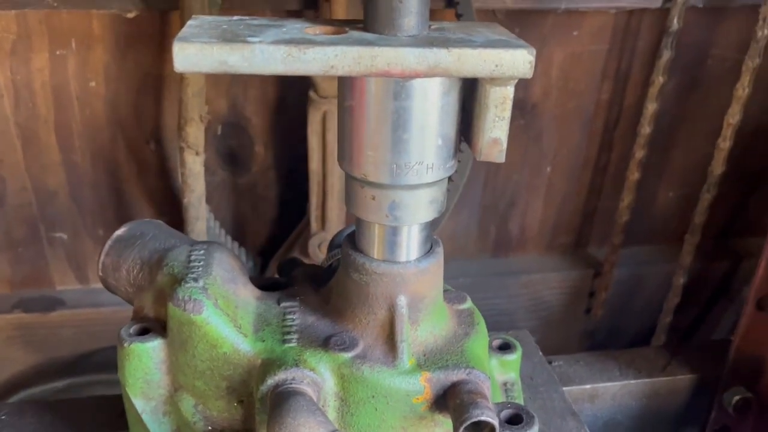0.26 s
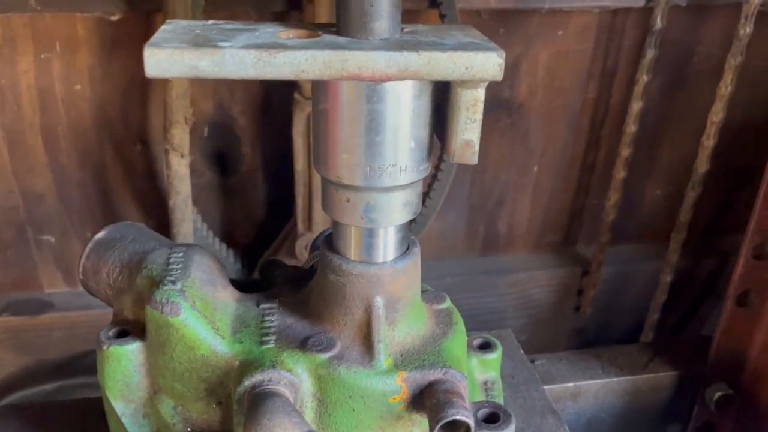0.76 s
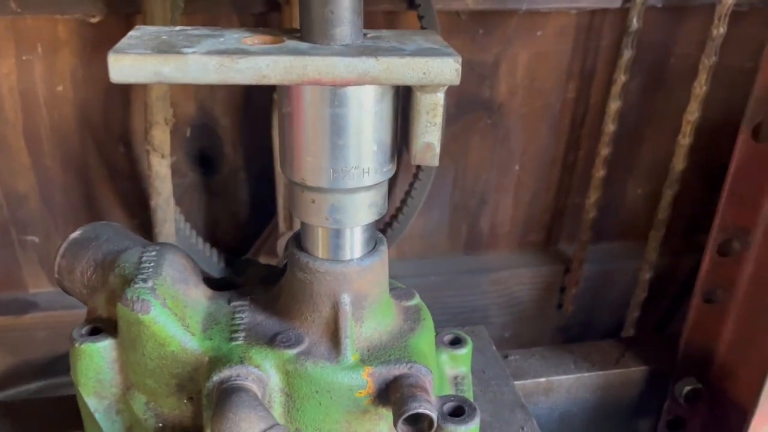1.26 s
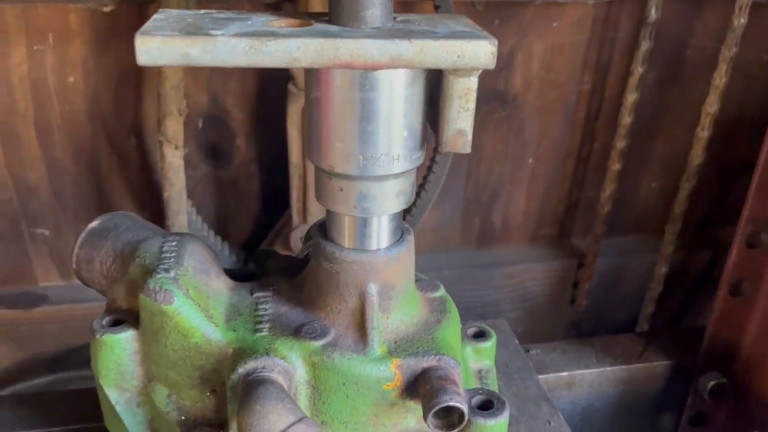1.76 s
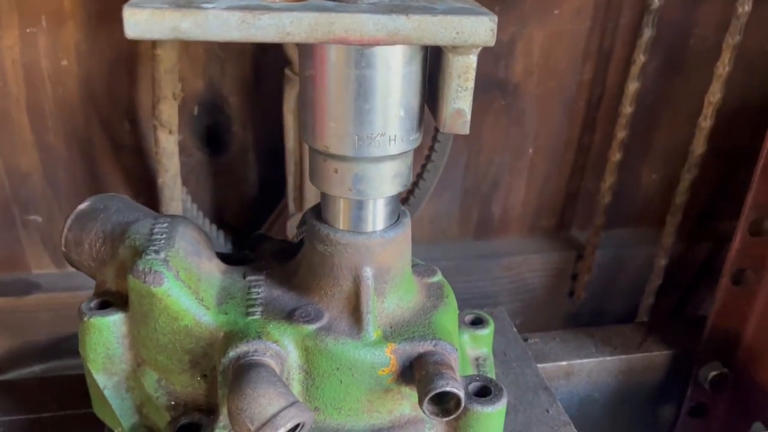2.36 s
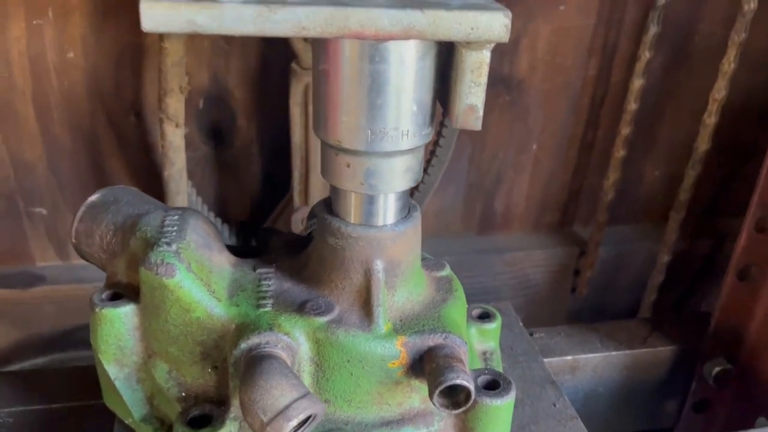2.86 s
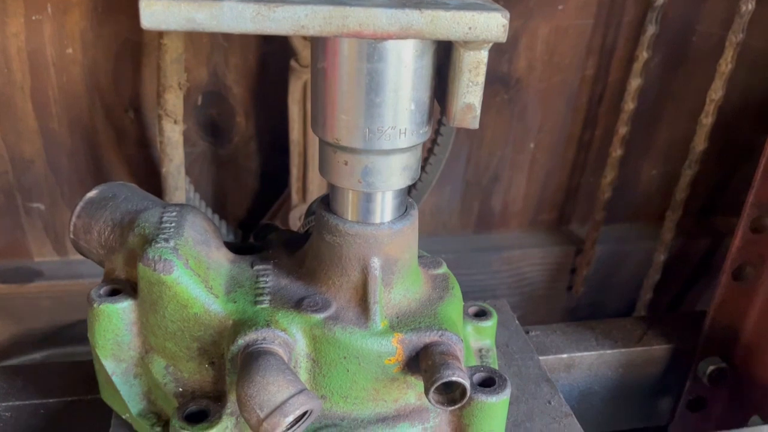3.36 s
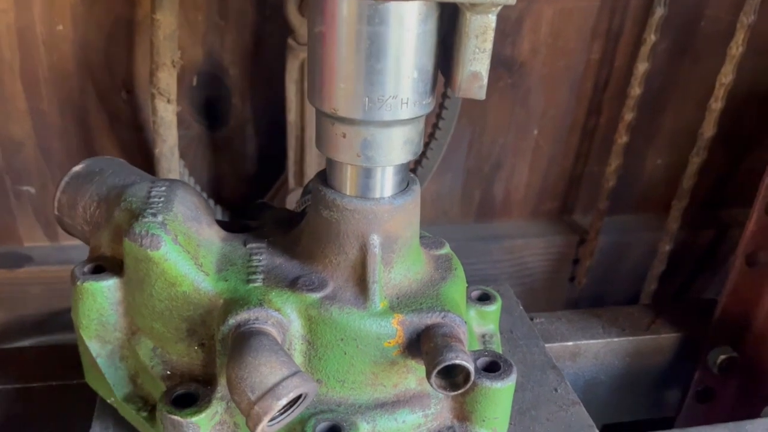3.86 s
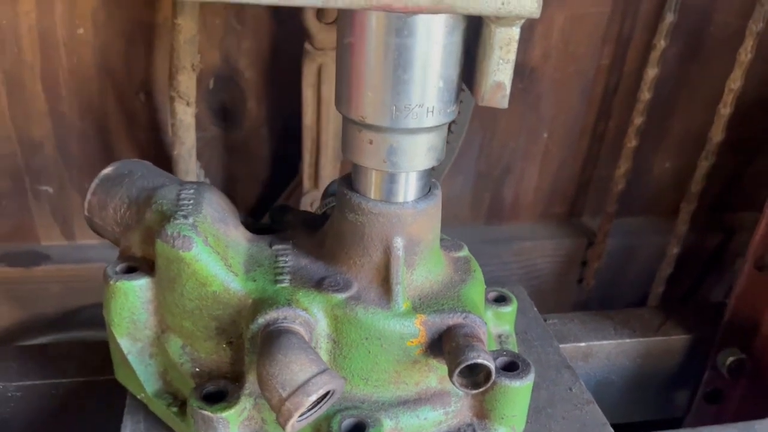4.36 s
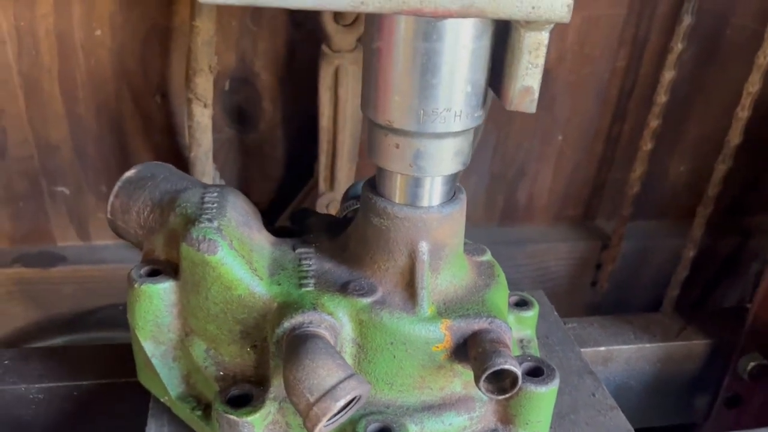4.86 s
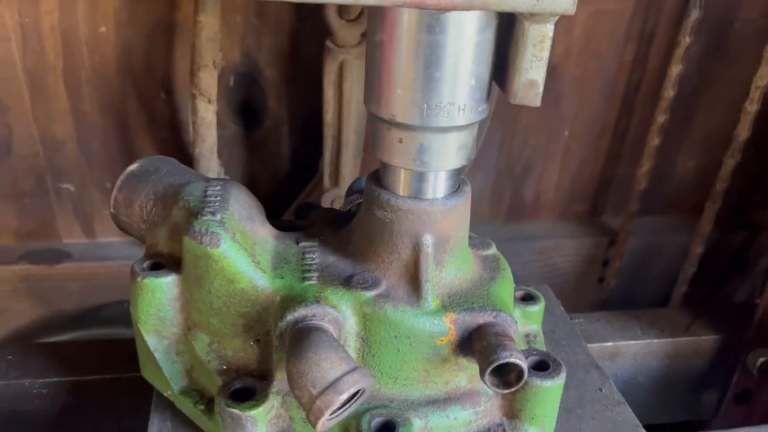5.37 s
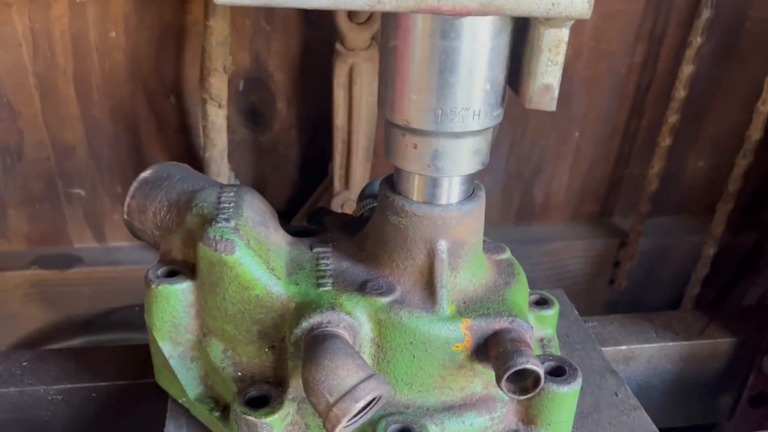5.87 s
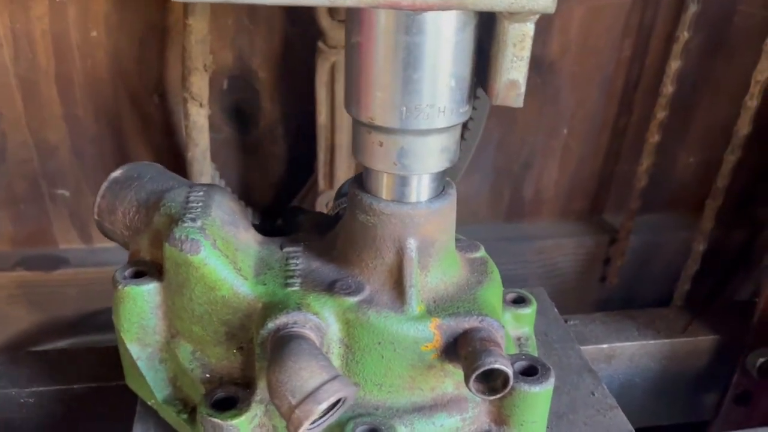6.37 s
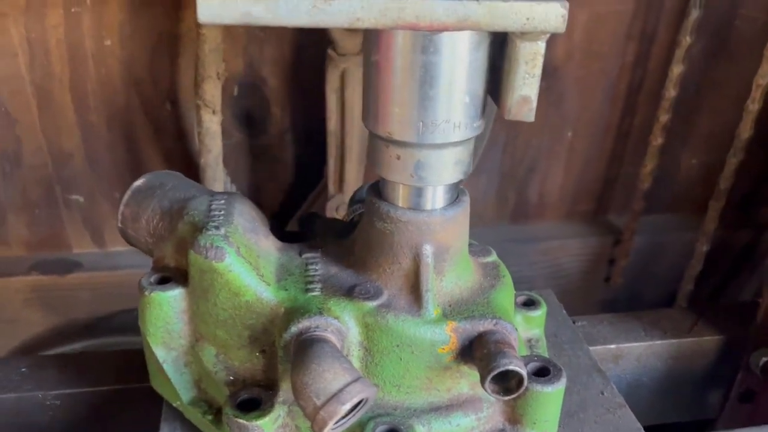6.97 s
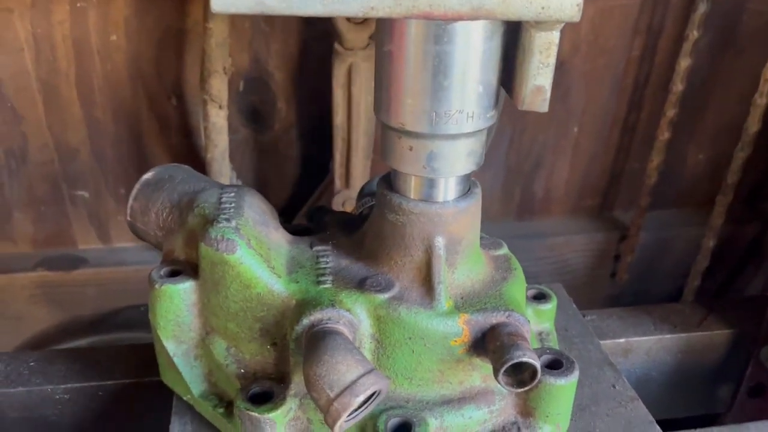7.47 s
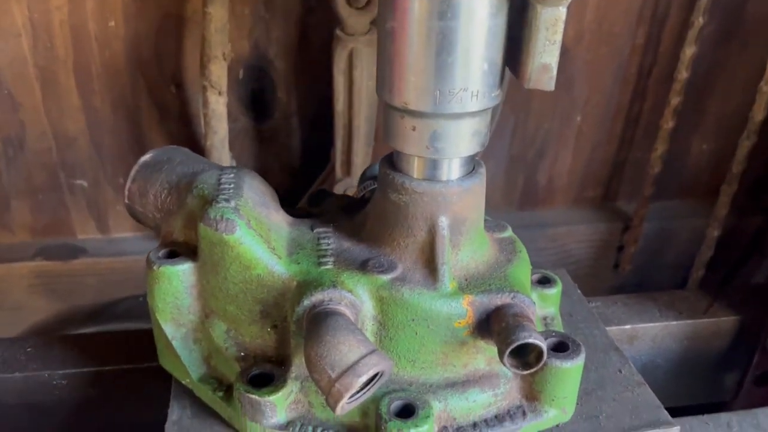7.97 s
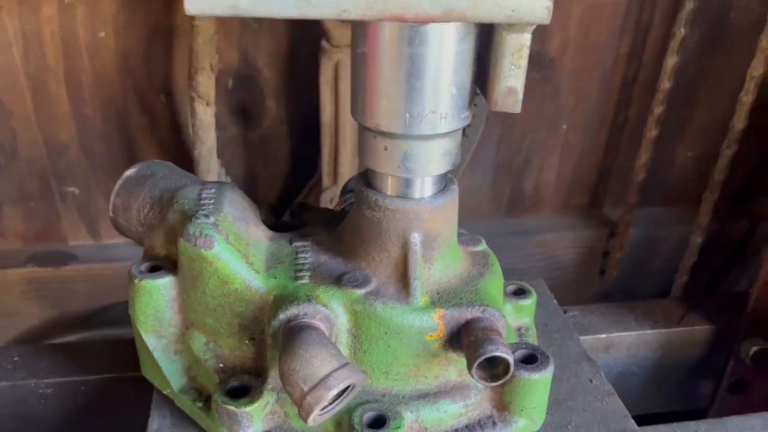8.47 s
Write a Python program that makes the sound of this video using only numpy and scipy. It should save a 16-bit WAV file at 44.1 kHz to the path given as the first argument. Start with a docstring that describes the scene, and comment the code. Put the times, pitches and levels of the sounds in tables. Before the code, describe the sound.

Close stereo phone pickup in a small wooden shed: a hydraulic press is pumped by hand. Its loose handle scrapes and clinks at each turn of the stroke, and roughly every one and a third seconds the bearing slips with a hard crack that rings frame and housing and thumps the boards. One brighter clank rings near the middle. The echo is short; faint rumble, hiss and high crickets lie underneath.

```python
"""A hand-pumped hydraulic press in a wooden shed, heard by a phone held close.
Its loose handle scrapes and clinks at each turn of the stroke; its bearing slips down with a crack that
rings frame and housing and shakes the boards. Steel parts are sets of fading tones (modes) set off by
short pushes; scrapes, cracks and the shed's echo are shaped noise. Crickets, a gliding tone in pulses,
trill outside over faint rumble and hiss made of filtered noise."""
import sys
import numpy as np
from scipy import signal
from scipy.fft import rfft, irfft
from scipy.io import wavfile
from scipy.ndimage import uniform_filter1d

SR = 44100
rng = np.random.default_rng(int(sys.argv[2]) if len(sys.argv) > 2 else 0)


def master_out(mix):
    """Clip the mix to full scale and print it as 16-bit PCM to the path in sys.argv[1]."""
    frames = np.transpose(np.atleast_2d(mix))
    ceiling = np.clip(frames, -1, 1)
    pcm = np.round(ceiling * 32767).astype(np.int16)
    wavfile.write(sys.argv[1], SR, pcm)


N = 384993
HZ = np.fft.rfftfreq(N, 1 / SR) + 1e-3  # spectrum lines, kept just above zero
FREE_MS = 13.5  # a struck part touches again this long after the blow


def undb(db):
    """Turn decibels into a plain factor."""
    return 10 ** (np.asarray(db) / 20)


def along(table):
    """Read a (frequency [Hz], value) table at every spectrum line."""
    hz, value = np.transpose(table)
    return np.interp(np.log(HZ), np.log(hz + 1), value)


def unit(x):
    """Scale a sound to an average (RMS) strength of 1."""
    return x / np.sqrt(np.mean(x ** 2))


def walk(rate):
    """Random values 1 / rate seconds apart, joined by straight slides."""
    spacing = int(SR / rate)
    steps = np.repeat(rng.standard_normal(N // spacing + 1), spacing)
    return uniform_filter1d(steps, spacing)[:N]


def coloured(table):
    """Steady noise whose spectrum follows a table."""
    spectrum = rfft(rng.standard_normal(N)) * undb(along(table))
    return unit(irfft(spectrum, N))


def place(at, size):
    """Put pushes of the given sizes on a silent track."""
    track = np.zeros(N, size.dtype)
    np.add.at(track, np.minimum(at, N - 1).ravel(), size.ravel())
    return track


def pole(hz, t60):
    """One sample's turn and fade of a mode that drops 60 dB in t60 seconds."""
    return np.exp((2j * np.pi * hz - np.log(1000) / t60) / SR)


def ring(push, hz, t60):
    """One fading mode driven by a force."""
    return signal.lfilter([1], [1, -pole(hz, t60)], push).imag


def contacts(blows, count, spread):
    """A light first touch, the main contact just after, then a rattle over a share of the free time."""
    time_s = np.array(blows)[:, 0]
    start = time_s[:, None] * SR
    free = FREE_MS * SR / 1000
    order = np.arange(count)
    rattle = rng.random((len(time_s), count)) * spread * free
    later = np.where(order > 1, rattle, order * 0.001206 * SR)
    size = undb(np.select([order == 0, order == 1], [-8.0, 0], -6.5))
    size = size * rng.choice([-1, 1], later.shape)
    # the contacts of one blow share its energy
    size = size / np.sqrt(np.sum(size ** 2, axis=1, keepdims=True))
    return (start + later).astype(int), size, (start + free).astype(int)


def body(modes, blows, blow_db, scatter_db, spread, choke, push_ms, count):
    """Every blow shares out differently over the modes; touching again chokes part of the ring."""
    at, size, touch = contacts(blows, count, spread)
    out = 0
    for hz, db, t60 in modes:
        chance = rng.standard_normal((len(blow_db), 2))
        strength = np.sign(chance[:, 0]) * undb(blow_db + db + scatter_db * chance[:, 1])
        share = size * strength[:, None]
        # what still rings at the new touch is partly taken away
        left_over = np.sum(share * pole(hz, t60) ** (touch - at), axis=1, keepdims=True)
        push = place(at, share + 0j) - choke * place(touch, left_over)
        out = out + ring(push, hz, t60)
    # a softer contact pushes longer and leaves the treble out
    shape = np.hanning(int(push_ms * SR / 1000) + 3)
    return np.convolve(out, shape / shape.sum())[:N]


def burst(colour, blow_db, tail_s):
    """Modes too dense to tell apart merge into a short burst of noise."""
    at, size, _ = contacts(BLOWS, count=5, spread=0.97)
    pushes = place(at, np.abs(size) * undb(blow_db)[:, None])
    fade = signal.lfilter([1], [1, -np.exp(-1 / (tail_s * SR))], pushes)
    return uniform_filter1d(fade, size=45, origin=22) * coloured(colour)


# colour of the outside air: (frequency [Hz], relative level [dB per Hz])
AIR_COLOUR = [(18, -39.5), (30, -10), (64, -8.5), (161, -18.5), (259, -21.5), (461, -25.5), (510, -19),
              (1050, -31.5), (1540, -21.5), (2130, -30.5), (2350, -27.5), (2950, -31), (6410, -38),
              (7640, -20.5), (12000, -47), (15600, -79.5), (22000, -120)]
# how alike left and right are: (frequency [Hz], likeness [0-1])
AIR_LIKENESS = [(60, .95), (300, 1), (1400, 0.6), (3000, 0.7), (7000, 0), (15000, 0.16)]


def air():
    """Rumble and hiss from outside; the bass is nearly the same at both ports and wanders in level."""
    mid, side = (rfft(rng.standard_normal(N)) * undb(along(AIR_COLOUR)) for _ in range(2))
    alike = along(AIR_LIKENESS)
    both = mid * np.sqrt(1 + alike) + side * np.sqrt(1 - alike) * np.array([[1], [-1]])
    bass = 1 / (1 + (HZ / 250) ** 2)
    rumble = irfft(both * bass, N) * undb(3.4 * walk(0.55))
    hiss = irfft(both * (1 - bass), N) * undb(0.5 * walk(3.1))
    return undb(-65) * unit(rumble + hiss)


def crickets(hz, rate, db):
    """A steady trill: each wing stroke rises to one pitch and falls again, swelling and fading over seconds."""
    turn = np.cumsum(rate * (1 + 0.035 * walk(4.5))) / SR % 1 - .5  # place within a stroke
    pulse = np.exp(-(turn / 0.12) ** 2)
    tone = np.sin(2 * np.pi * np.cumsum(hz * (1 - 2.4 * turn ** 2)) / SR)
    return undb(db + 1.8 * walk(1.0) + 2.5 * walk(90)) * unit(pulse * tone)


# the handle scrapes in its socket:
# (time [s], length [s], level at the start [dB], centre of the hiss [Hz])
SCRAPE_TIMES = [(0.007, 0.18, -68.5, 2210), (0.241, 0.058, -63.5, 2300), (.57, 0.078, -77.5, 3340),
                (1.738, 0.079, -60.5, 2300), (2.348, 0.043, -70, 2600), (3.012, 0.1, -68, 1940),
                (3.221, 0.075, -63, 2200), (3.95, 0.14, -71.5, 5400), (4.238, 0.046, -70, 2500),
                (4.328, 0.048, -65, 2496), (5.953, 0.17, -62.5, 2385), (6.413, 0.1, -64, 3030),
                (7.267, 0.14, -57.5, 2543), (7.4, 0.1, -67.5, 2100), (8.615, .065, -61, 2500)]
# colour of the scraping: (frequency [Hz], relative level [dB per Hz])
SCRAPE_COLOUR = [(900, 3.5), (1900, -11), (2600, -11), (3300, -15.5), (4200, -13), (6000, -5.5),
                 (10000, 2.5)]
# handle modes: (frequency [Hz], relative level [dB], time to fade by 60 dB [s])
HANDLE_MODES = [(795, -11, .08), (2159, -3, .06), (2290, -12, .05), (4102, 0, .09), (4092, -21, .3),
                (4112, -19, .28), (4215, -9, .06), (6545, -8, .08), (6580, -24, .35), (7410, -14, .06),
                (9490, -11, .07), (11760, -26, .04)]


def scrapes():
    """Dry steel sliding on steel: a gritty hiss that catches, lets go and keeps the handle singing."""
    swell_db, release_s = 8, 0.013  # it grows as the handle nears its stop
    half_width_octaves = .42
    t = np.arange(N) / SR
    grit = np.zeros(N)
    hiss = undb(5.0 * walk(220)) * coloured(SCRAPE_COLOUR)
    for start_s, length_s, db, hz in SCRAPE_TIMES:
        swell = undb(db + swell_db * np.clip((t - start_s) / length_s, 0, 1))
        release = np.exp(-np.maximum(t - start_s - length_s, 0) / release_s)
        level = (t > start_s) * swell * release
        edges = hz * 2. ** np.array([-half_width_octaves, half_width_octaves])
        sos = signal.butter(2, edges, "band", fs=SR, output="sos")
        grit += uniform_filter1d(level, size=400) * unit(signal.sosfilt(sos, hiss))
    singing = sum(undb(db) * ring(grit, hz, t60) for hz, db, t60 in HANDLE_MODES)
    return grit + undb(-35.5) * singing


# boards shaken: (time [s], low mode level [dB], high mode level [dB], high mode frequency [Hz],
# time to fade by 60 dB [s])
BOARD_THUDS = [(0.163, -50.5, -48.5, 68.3, 0.76), (0.509, -55, -63, 68, 0.4),
               (0.976, -38.5, -33, 69.9, 0.84), (1.269, -65, -47.5, 70.7, 0.57),
               (1.987, -46, -50, 67.2, 0.52), (2.514, -52, -40.5, 66.7, 0.44),
               (2.809, -61, -54, 65.3, 0.57), (3.444, -40, -45.5, 70.6, 0.37),
               (3.839, -30.5, -36.5, 74.7, 0.68), (4.119, -62, -50.5, 75.5, 0.57),
               (4.388, -44.5, -43, 69.6, 0.58), (4.732, -51, -48, 83.6, 0.71),
               (4.827, -47.5, -39, 76.2, 0.89), (5.178, -33, -27.5, 76.9, 0.5),
               (5.457, -74, -47, 83.3, 0.27), (5.955, -58.5, -55.5, 69, 0.35),
               (6.187, -43.5, -40.5, 70.4, 0.49), (6.542, -45, -34, 77.3, 1.3),
               (7.212, -64.5, -53, 66.4, 1.8), (7.53, -38.5, -59, 67.3, 0.38),
               (7.891, -35.5, -37.5, 72.5, 0.69), (8.189, -53, -76, 68.3, 0.33),
               (8.454, -79, -60.5, 76.8, 0.26)]


def boards():
    """Two low modes of the shed swell for a moment after a push, then die away; the load shifts the higher one."""
    low_hz, rise_ms = 58.13, 4.1
    out = np.zeros(N)
    for time_s, low_db, high_db, high_hz, t60 in BOARD_THUDS:
        start = int(time_s * SR)
        t = np.arange(N - start)[:SR] / SR
        swell = (1 - np.exp(-t * 1000 / rise_ms)) ** 2 * undb(0.5 - 60 * t / t60)
        low = undb(low_db) * np.sin(2 * np.pi * low_hz * t)
        high = undb(high_db) * np.sin(2 * np.pi * high_hz * t)
        out[start:][:SR] += swell * (low + high)
    return out * undb(1.5 * walk(25))


# every blow: (time [s], force on the frame [dB], ring of the handle [dB], knock into the table [dB],
# crack [dB])
BLOWS = [(0.3112, -35.5, -32, -49, -46), (0.3774, -55, -66, -50, -60), (0.405, -35, -71, -42, -46.5),
         (0.4482, -58, -76, -39, -57), (0.9647, -21, -68, -20.5, -38), (1.103, -53, -74.5, -28, -81),
         (1.2529, -31.5, -30, -54, -31.5), (1.2699, -32.5, -39, -36, -70), (1.3101, -22, -26.5, -61, -23),
         (1.3224, -26, -23.5, -35, -32.5), (1.8057, -29, -26.5, -51, -32.5), (1.824, -45.5, -35, -49, -40),
         (1.8794, -67, -69.5, -45, -62), (1.9006, -37.5, -67, -53.5, -58), (1.946, -44, -58, -32, -52.5),
         (2.0794, -82, -89.5, -48, -83), (2.1864, -79, -76, -89, -69), (2.473, -78, -91, -41.5, -83.5),
         (2.5139, -61, -88, -33, -82), (2.6717, -42.5, -55.5, -53, -60), (2.7289, -28, -25, -46, -30),
         (2.7818, -21.5, -24, -46, -25), (2.7954, -33.5, -29.5, -37.5, -33),
         (2.8108, -50, -66, -25.5, -56.5), (3.2788, -34.5, -32.5, -62, -41), (3.3047, -41, -37, -58, -37.5),
         (3.3886, -31.5, -38, -55, -24.5), (3.407, -22.5, -38.5, -25, -26), (3.5634, -75, -83, -49, -79),
         (3.7339, -54, -64, -80, -52), (3.8357, -15.5, -42, -18, -31), (3.9204, -51, -77, -39, -78),
         (4.067, -60, -75, -47, -66), (4.1111, -23.5, -38.5, -34, -29.5), (4.1345, -30, -34, -43.5, -35),
         (4.1707, -25, -30.5, -36, -30.5), (4.189, -42.5, -42.5, -50.5, -39),
         (4.3745, -14, -27, -17.5, -25.5), (4.619, -47, -72, -38.5, -57), (4.64, -40, -50, -21.5, -49),
         (4.6554, -28.5, -28.5, -25, -41), (4.749, -32.5, -32, -31, -23), (4.7569, -27, -44, -21.5, -40),
         (4.8968, -66.5, -81, -45.5, -78), (4.9556, -58.5, -73, -57.5, -55),
         (4.991, -53, -86.5, -62.5, -48), (5.1644, -20.5, -58, -18, -40.5),
         (5.3973, -39, -42.5, -57.5, -66), (5.4561, -26, -37, -44.5, -29), (5.4744, -41.5, -31, -40, -28.5),
         (5.5248, -21.5, -29.5, -35, -27), (5.8331, -51, -84, -55.5, -56.5),
         (5.971, -53, -76.5, -51, -55.5), (6.0034, -39.5, -65.5, -73, -53),
         (6.0224, -50, -63.5, -60.5, -58), (6.0934, -41, -34.5, -65, -36.5),
         (6.1508, -24, -37, -25.5, -20.5), (6.2503, -52.5, -72, -41, -61),
         (6.4348, -63.5, -61, -62.5, -55.5), (6.4782, -63, -68, -55.5, -46.5),
         (6.5356, -27.5, -59.5, -21.5, -67.5), (6.8209, -28.5, -27.5, -47.5, -24),
         (6.8351, -28, -32, -55, -25.5), (6.8702, -21.5, -32.5, -34.5, -25),
         (6.8844, -27, -22.5, -44, -33.5), (7.1752, -40.5, -54, -46.5, -63), (7.3014, -49, -75, -49, -75),
         (7.3497, -32.5, -30.5, -50, -40.5), (7.3806, -37.5, -33, -65.5, -41),
         (7.451, -48.5, -60, -55, -58), (7.4764, -35.5, -54, -30.5, -43), (7.4864, -54, -67.5, -26, -61.5),
         (7.5894, -65.5, -95.5, -39.5, -76), (7.8813, -18, -43, -15.5, -29), (8.1686, -28, -34, -45, -23),
         (8.1882, -33, -32.5, -33.5, -39.5), (8.2337, -20.5, -25.5, -33.5, -23.5),
         (8.6866, -47, -26, -58.5, -37.5), (8.7074, -30, -38, -63, -24.5)]
FRAME_DB, HANDLE_DB, KNOCK_DB, CRACK_DB = np.array(BLOWS)[:, 1:].T
# frame modes: (frequency [Hz], relative level [dB], time to fade by 60 dB [s])
FRAME_MODES = [(1600, -7, .055), (1790, -3, .055), (1880, 0, .06), (2065, -2, .055), (2320, -3, .055),
               (2580, -4, .05), (2790, -3, .06), (3117, -8, .05), (3250, -8, .055), (3634, -11, .05),
               (3905, -13, .05), (4740, -13, .05)]
# colour of the crunch: (frequency [Hz], relative level [dB per Hz])
CRUNCH_COLOUR = [(300, -10.5), (700, -3.5), (1000, -6.5), (1400, -3.5), (2000, 1), (2800, 2), (4500, -8.5),
                 (6000, -37)]


def frame():
    """The struck frame rings, with a crunch of merged modes that has a short and a long tail."""
    tones = body(FRAME_MODES, BLOWS, FRAME_DB, scatter_db=5.5, spread=.7, choke=0.28, push_ms=.12, count=5)
    short = burst(CRUNCH_COLOUR, FRAME_DB, tail_s=0.0087)
    long = burst(CRUNCH_COLOUR, FRAME_DB, tail_s=0.032)
    return undb(-11.0) * tones + undb(-10.5) * short + undb(-32.0) * long


def handle():
    """The loose handle clinks: very short, hard contacts set off its bright modes."""
    clinks = body(HANDLE_MODES, BLOWS, HANDLE_DB, scatter_db=2.5, spread=.2, choke=0.41, push_ms=.03, count=2)
    return undb(1.0) * clinks


# press table modes: (frequency [Hz], relative level [dB], time to fade by 60 dB [s])
TABLE_MODES = [(548.4, -10.5, 0.14), (577.8, -8.5, 0.16), (643, -4, 0.076), (700.4, -5, .07),
               (846, 5.5, 0.025)]


def press_table():
    """Blows knock into the press table, whose lower modes answer a softer push."""
    knocks = body(TABLE_MODES, BLOWS, KNOCK_DB, scatter_db=6.0, spread=.4, choke=0.2, push_ms=0.76, count=2)
    return undb(-6.5) * knocks


# housing modes: (frequency [Hz], relative level [dB], time to fade by 60 dB [s])
HOUSING_MODES = [(1127, -4, 0.013), (1267, -7, 0.027), (1327, -1, 0.023), (1620, -0.5, 0.1)]


def housing():
    """The knock into the table reaches the housing, which answers hard knocks more than soft ones."""
    hard_db, steepness = -26, 1.55
    housing_db = hard_db + steepness * (KNOCK_DB - hard_db)
    knocks = body(HOUSING_MODES, BLOWS, housing_db, scatter_db=2.5, spread=0.32, choke=0.37, push_ms=.35, count=3)
    return undb(-5.5) * knocks


# colour of the crack: (frequency [Hz], relative level [dB per Hz])
CRACK_COLOUR = [(2500, -16), (4500, -0.5), (5900, 4.5), (7500, -1.5), (10000, -4), (12500, -10),
                (14500, -12.5), (16500, -22)]


def crack():
    """A sharp burst of bright noise on each blow."""
    return undb(-3.5) * burst(CRACK_COLOUR, CRACK_DB, tail_s=0.0053)


# base modes: (frequency [Hz], relative level [dB], time to fade by 60 dB [s])
BASE_MODES = [(140, -5, 0.22), (184, -7, 0.25), (275.2, -2, 0.12), (337.5, 5, 0.13)]


def base():
    """The knock into the table also reaches the heavy base, which takes up a blow slowly."""
    base_db = KNOCK_DB - 18
    return body(BASE_MODES, BLOWS, base_db, scatter_db=3.5, spread=1.0, choke=0.2, push_ms=3.84, count=4)


# the bearing slips down: (time [s], ram level [dB], crossbeam hum [dB], jolt in the base [dB])
SLIPS = [(0.9647, -24, -51, -41), (3.8351, -23, -58, -35.5), (5.165, -25.5, -52.5, -28.5),
         (6.535, -32, -43, -38), (7.8807, -23, -42, -40.5)]
_, RAM_DB, BEAM_DB, JOLT_DB = np.array(SLIPS).T
# ram and crossbeam modes: (frequency [Hz], relative level [dB], time to fade by 60 dB [s])
RAM_MODES = [(800, -3, .055), (1250, -4, .055), (1445, -6, .06), (1830, 0, .06), (1900, 0, .055),
             (2220, -4, .055), (2795, -2, .06)]
BEAM_MODES = [(822, 0, .7)]


def slip_ring():
    """The slipping bearing rings the ram and makes the crossbeam hum on."""
    ram = body(RAM_MODES, SLIPS, RAM_DB, scatter_db=1.5, spread=0.98, choke=0.17, push_ms=.15, count=3)
    beam = body(BEAM_MODES, SLIPS, BEAM_DB, scatter_db=-1.0, spread=.5, choke=0, push_ms=1.0, count=2)
    return ram + beam


def slip_jolt():
    """Each slip also jolts the base, through a fairly slow push."""
    return body(BASE_MODES, SLIPS, JOLT_DB, scatter_db=0.0, spread=0.983, choke=0.055, push_ms=2.3, count=4)


# the handle strikes the jack's casing: (time [s], level [dB])
CLANKS = [(4.3744, -12), (4.638, -38.5)]
# casing modes: (frequency [Hz], relative level [dB], time to fade by 60 dB [s])
CASING_MODES = [(1148, -14, .2), (1388, 0, .26), (1468, -6, .2), (2068, -10, .25), (2322, -13, .1),
                (3905, -15, .25), (6578, -12, .22)]


def casing():
    """The handle strikes the jack's casing: a hard contact, mostly choked by the next touch."""
    clank_db = np.array(CLANKS)[:, 1]
    return body(CASING_MODES, CLANKS, clank_db, scatter_db=1.0, spread=.2, choke=0.77, push_ms=.03, count=2)


def press():
    """All struck parts together; the small steel parts radiate no bass, the base does."""
    upper = frame() + handle() + press_table() + housing() + crack() + slip_ring() + casing()
    no_bass = signal.butter(4, 380, "high", fs=SR, output="sos")
    return signal.sosfilt(no_bass, upper) + base() + slip_jolt()


# echo bands: (centre frequency [Hz], time to fade by 60 dB [s], level [dB])
SHED_BANDS = [(150, 0.49, -11.5), (650, 0.38, -9.5), (1950, 0.072, -13), (4740, 0.2, -14),
              (10600, 0.099, -19)]


def shed(x):
    """Echo of the shed: noise that fades band by band, unrelated left and right."""
    t = np.arange(SR // 2) / SR
    echo = 0
    for hz, t60, db in SHED_BANDS:
        sos = signal.butter(1, [hz / 1.9, hz * 1.9], "band", fs=SR, output="sos")
        band = signal.sosfilt(sos, rng.standard_normal((2, len(t))))
        band = band * undb(-60 * t / t60) * (t > .004)  # the echo starts after 4 ms
        echo = echo + undb(db) * band / np.sqrt(t60 * SR / 14)
    return signal.fftconvolve(x[None], echo, axes=1)[:, :N]


# phase by which the left microphone port leads the right: (frequency [Hz], phase [rad])
PORT_PHASE = [(0, -2), (860, 1.59), (1210, 7), (1640, 3.5), (1890, 7.5), (2840, 6.5), (3100, 7.5),
              (3790, 7), (8180, 0.5), (10400, 0.87), (11900, -2.5), (13400, -2.5), (14800, -1), (16200, -8)]
# left minus right, before an even shift: (frequency [Hz], level [dB])
PORT_TILT = [(60, -2.5), (110, -0.5), (200, -7.5), (380, 0), (700, 1), (1290, 4.5), (2380, -0.5), (4400, 6),
             (8120, 4.5), (15000, -2)]


def microphone_ports(x):
    """The two ports hear the direct sound with different phase and level at each pitch."""
    pan_db = -0.7  # even shift, left minus right
    # each port takes half of the difference
    left = np.exp(.5j * along(PORT_PHASE)) * undb((along(PORT_TILT) + pan_db) / 2)
    return irfft(rfft(x) * np.array([left, 1 / left]), N)


def scene():
    """The press heard directly and through the shed's echo, with the air and crickets outside."""
    outside = air() + crickets(hz=7400, rate=15.6, db=-79.5)  # top pitch; strokes per second
    steel_and_boards = scrapes() + boards() + press()
    return outside + microphone_ports(steel_and_boards) + shed(steel_and_boards)


def record(dry):
    """The phone cuts the deepest bass and the top."""
    dry = signal.sosfilt(signal.butter(3, 42, "high", fs=SR, output="sos"), dry)
    return signal.sosfilt(signal.ellip(10, .2, 80, 16300, fs=SR, output="sos"), dry)


dry = scene()
out = record(dry)
master_out(out)
```